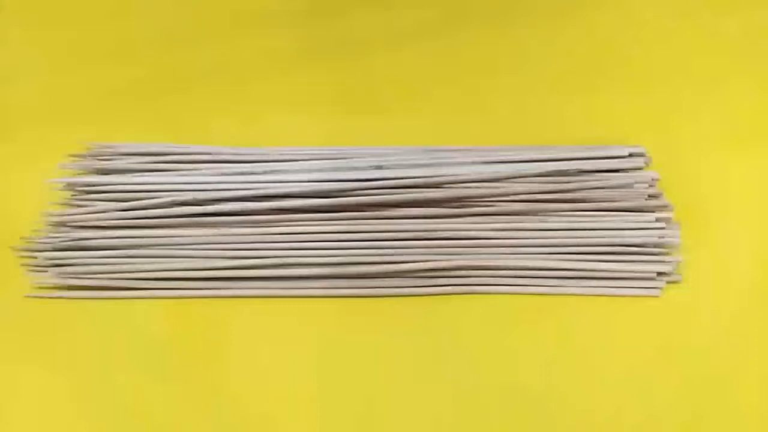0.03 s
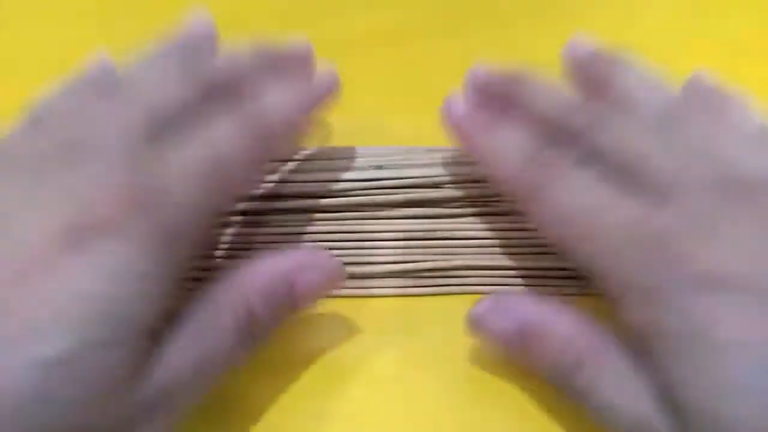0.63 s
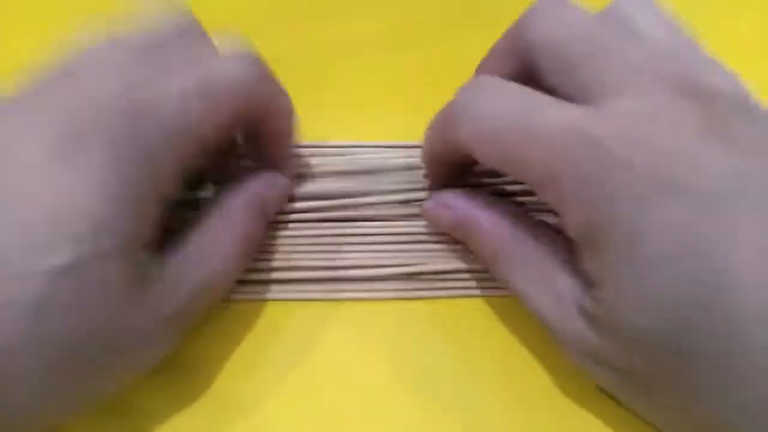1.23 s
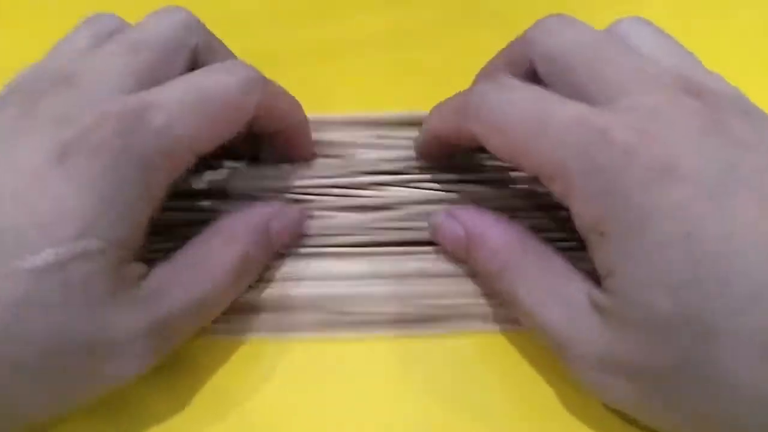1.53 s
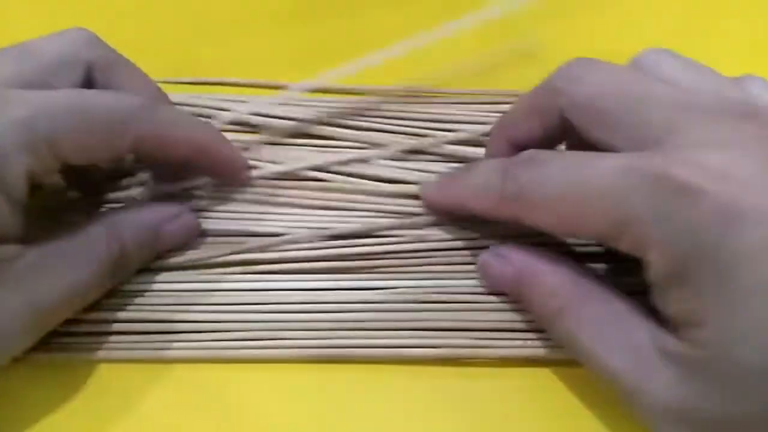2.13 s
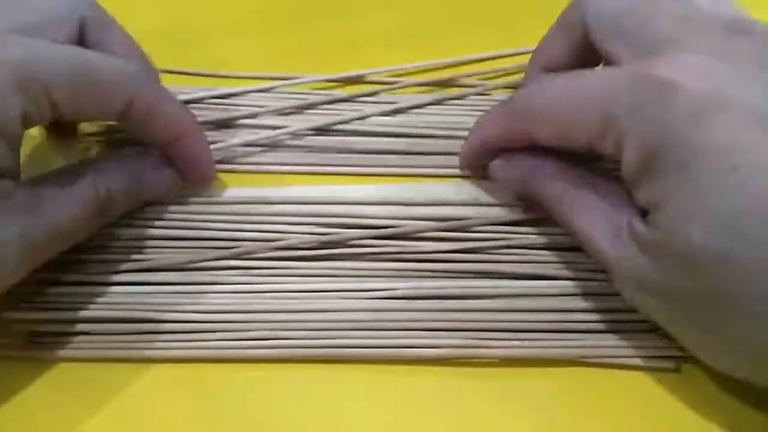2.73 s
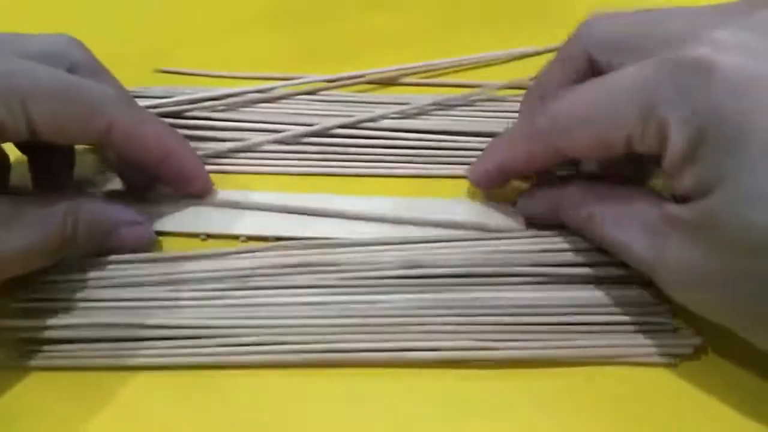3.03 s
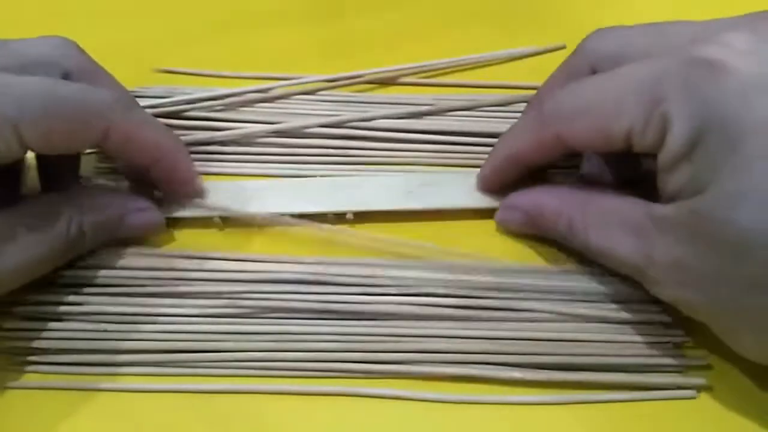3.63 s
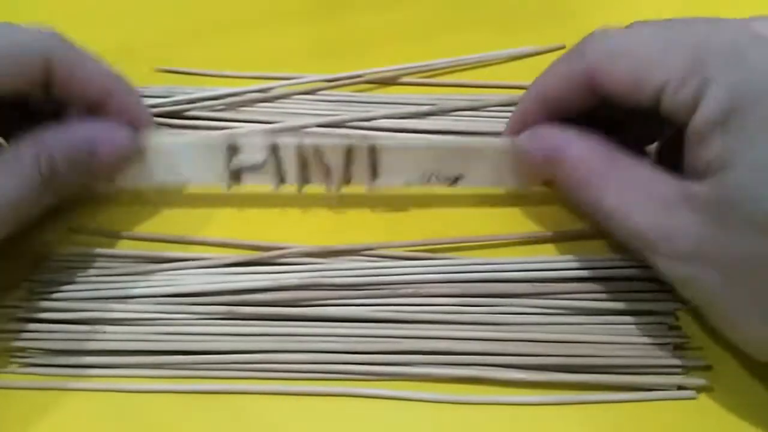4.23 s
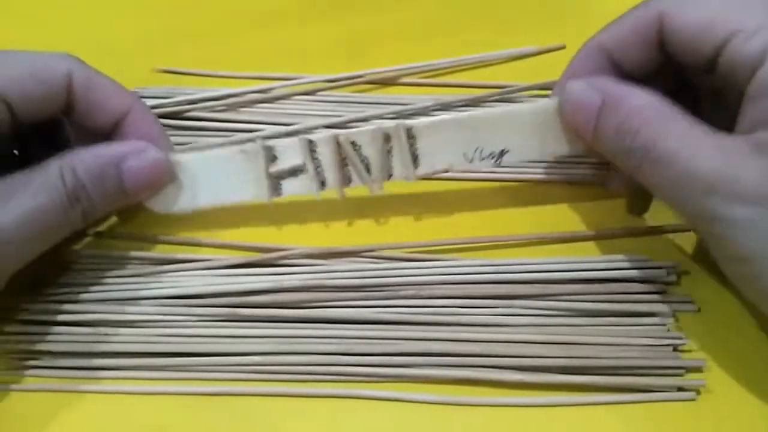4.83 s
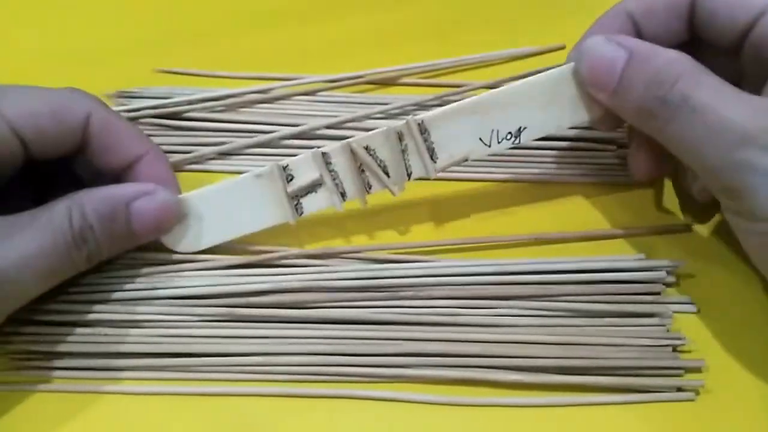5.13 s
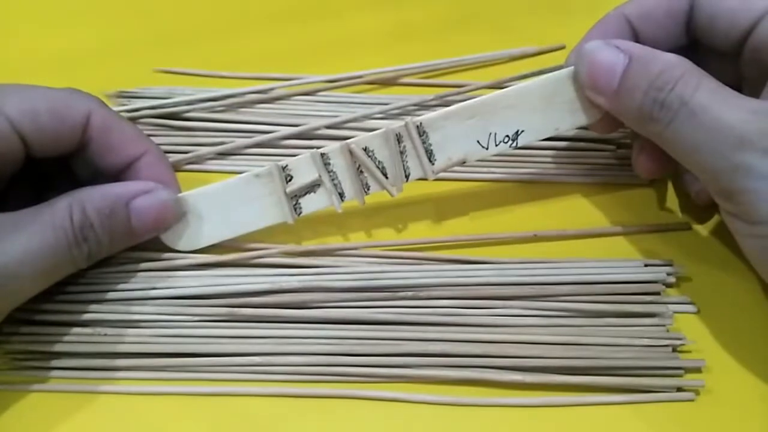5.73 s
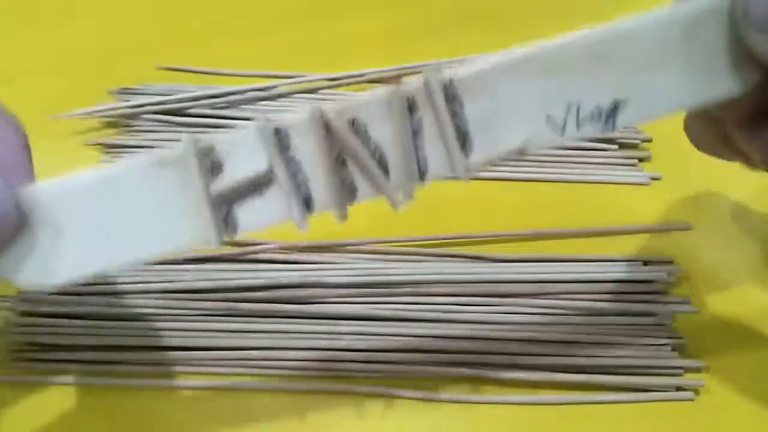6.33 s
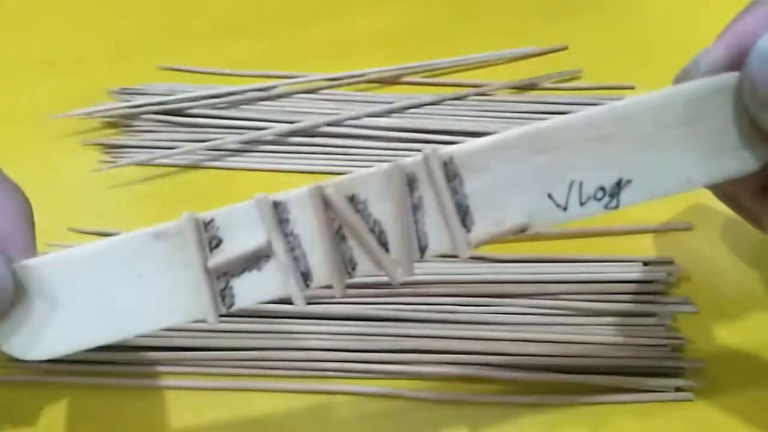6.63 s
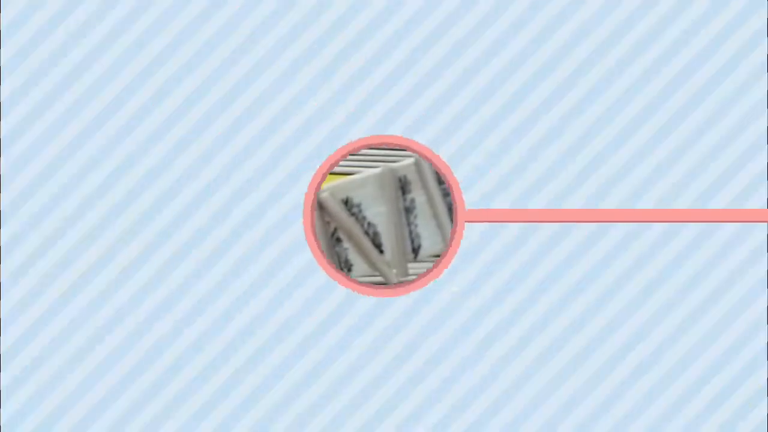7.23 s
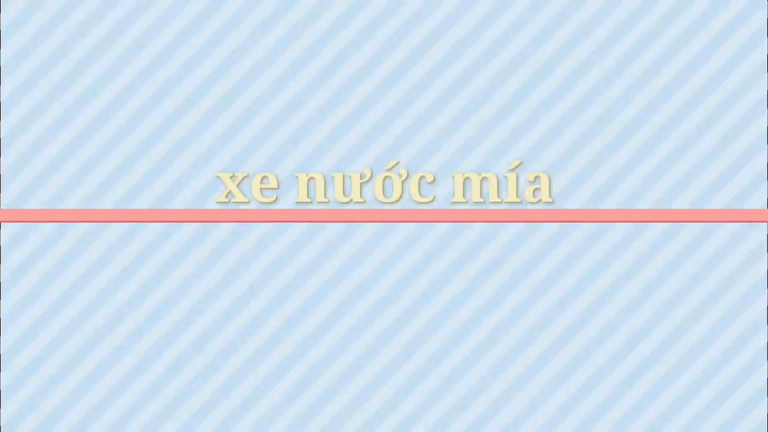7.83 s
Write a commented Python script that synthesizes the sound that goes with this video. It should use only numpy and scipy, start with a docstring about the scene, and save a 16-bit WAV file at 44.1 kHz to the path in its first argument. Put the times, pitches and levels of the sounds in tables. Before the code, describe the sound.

After a moment of faint room noise, hands shove and spread a pile of thin bamboo skewers on a table, making a dry rustling rattle with sharp clacks. About halfway through, the clatter ends with a few light knocks on a flat wooden slat. Faint finger rubbing follows, along with soft low bumps of air on the microphone. The wood sounds almost entirely on the right, in a small room.

```python
"""Faint room noise and a low puff of air come first; then two hands shove and part a pile of thin bamboo
skewers on a table. Each shove excites a swarm of stick-on-stick impacts, with sharper clacks among them.
A flat wooden slat is lifted out, its damped modes tapped and rubbed by the fingers. The wood and the
small room's reverberation lie almost wholly on the right; moving air buffets both microphone ports."""
import sys
import numpy as np
from scipy import signal
from scipy.fft import rfft, irfft
from scipy.io import wavfile
from scipy.ndimage import uniform_filter1d

SR = 44100
rng = np.random.default_rng(int(sys.argv[2]) if len(sys.argv) > 2 else 0)


def put_to_file(sound):
    """Save the sound as 16-bit audio at rate SR, in the file named by the first command-line argument."""
    columns = np.atleast_2d(sound).T  # one column per channel
    safe = np.clip(columns, -1, 1)
    whole_steps = np.round(safe * 32767)
    wavfile.write(sys.argv[1], SR, whole_steps.astype(np.int16))


N = 352359
TIME = np.arange(N) / SR

# Course of the room noise: time_s, level_db
AMBIENCE_LEVELS = [(.2, -60.5), (.7, -59.5), (2, -54.5), (3.9, -58), (4.8, -59), (6.9, -56.5), (8, -62)]
# Spectrum of the room noise: frequency_hz, gain_db
AMBIENCE_SPECTRUM = [(80, -21), (180, -2.5), (220, -6.5), (330, -15), (405, -6), (540, -17.5), (700, -16.5),
                     (950, -11), (1540, -20), (2200, -20.5), (2850, -29), (5200, -34.5), (7100, -45),
                     (15500, -53.5)]
# Spectrum of the faint hiss on the left: frequency_hz, gain_db
LEFT_HISS_SPECTRUM = [(100, -4.5), (210, 5), (300, -7.5), (700, -14), (1000, -16), (1500, -21), (3000, -23),
                      (5000, -31.5), (15000, -32.5)]
# Spectrum of the thin hiss on the right: frequency_hz, gain_db
THIN_HISS_SPECTRUM = [(1000, -21), (2600, 7.5), (5000, -5), (7000, -1), (15500, -15.5)]
# Puffs of air at the ports: peak_s, half_width_s, left_db, right_db
PUFFS = [(0.372, 0.02, -67, -45.5), (1.033, 0.11, -42.5, -47), (2.064, 0.051, -44, -46),
         (2.303, 0.12, -44, -54), (2.844, 0.06, -53, -54), (3.626, 0.061, -50, -48),
         (4.035, 0.039, -46, -45), (4.55, 0.48, -52.5, -54.5), (5.407, 0.15, -43.5, -47.5),
         (5.927, 0.28, -45.5, -44), (6.472, 0.13, -44.5, -42), (7.03, 0.2, -45.5, -44),
         (7.632, 0.018, -70, -39)]
# Rumble of a gentle draught: frequency_hz, gain_db
RUMBLE_SPECTRUM = [(15, -38.5), (28, -25), (54, 2.5), (80, -3), (150, -21), (260, -31.5), (600, -50),
                   (2000, -91)]
# Eddies that a strong draught adds: frequency_hz, gain_db
EDDY_SPECTRUM = [(40, -13.5), (110, -5.5), (180, 4.5), (300, -17.5), (600, -17.5), (1200, -53.5),
                 (3000, -83.5)]
# Radiation of the pile on the table: frequency_hz, gain_db
PILE_SPECTRUM = [(120, -37), (250, -13), (390, -10), (540, -21.5), (780, -13.5), (930, 3), (1100, -3),
                 (1300, -10), (1560, 3), (1900, -10.5), (2600, -9.5), (3400, -5.5), (5400, -4), (7200, -16),
                 (15500, -30.5)]
# Fingers push through the pile: start_s, length_s, level_db, body_over_usual_db
HAND_SHOVES = [(0.721, 0.0094, -43, -1.5), (0.739, 0.0094, -44.5, 5), (1.021, 0.031, -57, -10),
               (1.068, 0.011, -50, 1.5), (1.102, 0.014, -49.5, -3), (1.245, 0.008, -52.5, -7),
               (1.272, 0.0046, -32, 2), (1.282, 0.015, -34.5, -0.5), (1.326, 0.015, -49.5, -12),
               (1.444, 0.069, -45, -1), (1.56, 0.087, -41.5, 3.5), (1.79, 0.0078, -48, -1.5),
               (1.876, 0.013, -51, 5), (2.019, 0.031, -45.5, 1), (2.059, 0.12, -48, -3.5),
               (2.427, 0.079, -47, 1), (2.54, 0.036, -47.5, -1.5), (2.597, 0.12, -51, 1),
               (2.818, 0.062, -48.5, 1.5), (2.978, 0.0085, -46, -7.5), (3.046, 0.033, -49, -2.5),
               (3.176, 0.051, -50.5, 2.5), (3.33, 0.018, -48.5, -6.5), (3.452, 0.011, -56, -8),
               (3.521, 0.017, -50, -5.5), (3.646, 0.083, -56, 0.5), (3.781, 0.014, -53.5, 3),
               (3.821, 0.1, -50, 1), (5.937, 0.0055, -58.5, -5), (6.03, 0.029, -65.5, -2)]
# Fingers keep stirring the pile: start_s, end_s, level_db, body_relative_db
HAND_STIRS = [(1.303, 1.722, -52.5, -5), (1.72, 1.996, -65, 3.5), (2.002, 2.414, -55.5, 1.5),
              (2.415, 3.32, -65, 4)]
# One stick snaps onto another:
# start_s, level_before_gain_db, body_relative_db, edge_relative_db, ring_hz, ring_db, bounce_step_db
STICK_CLACKS = [(0.727, -37, -16, 1, 5200, 10, -7), (0.735, -39.5, -9, -5, 4400, 2, -5),
                (0.750, -35, -1, -7, 4560, 9, -8), (1.026, -53.5, 6.5, -7, 4970, 12, -3),
                (1.067, -42, -2.5, -14, 4440, 14, -1.5), (1.088, -46, -8, -20, 4130, 18, 0),
                (1.109, -41.5, -4.5, -10, 4500, 12, -7), (1.248, -46, -10.5, -16, 4000, 10, -3),
                (1.268, -28.5, -10, -7, 4400, 6, -2.5), (1.282, -24, -2, -12, 5350, 18, -4.5),
                (1.287, -26, -7, -16, 5200, 11, -17), (1.388, -42.5, -7, -16, 4840, 3, -1.5),
                (1.437, -36.5, -12, -14, 3370, 2, -2.5), (1.457, -41, -18, -14, 5200, 6, -1),
                (1.472, -31.5, -15, -23, 5400, 2.5, -12), (1.524, -36, 1, -25, 5300, 19, -14),
                (1.553, -40, 5.5, -20, 4460, 0, -10), (1.602, -36, -12, -14, 4500, 2, -2),
                (1.609, -36, -10, -13, 3900, 8, -5), (1.635, -33, -10, -9, 3870, 1, -2),
                (1.794, -37, -9, -10, 5200, 2, -9), (1.873, -44, -8, -18, 4900, 5, -4),
                (1.885, -37, -11, -24, 5300, 16, -10), (2.01, -29.5, -2, -2.5, 5450, 18, -13),
                (2.025, -33, -23, -22, 5500, 14, -16), (2.03, -37, -18, -20, 5500, 12, -16),
                (2.04, -27.5, -4.5, -14, 5400, 17, -13), (2.045, -34, -12, -18, 5450, 10, -12),
                (2.078, -41, -14, -18, 5600, 11, -12), (2.1, -34.5, -18, -20, 5350, 9, -12),
                (2.126, -32, -20, -21, 4660, 17, -18), (2.159, -40.5, 5, -1, 5200, 8, -12),
                (2.247, -40, -0.5, -8, 4950, 12, -11), (2.316, -39, 1, -8, 5130, 12, -11),
                (2.384, -45, -7, -16, 4800, 6, -12), (2.419, -42.5, 0, -11, 4800, 2, -2),
                (2.444, -37.5, -13, -7, 4670, 8, -3.5), (2.487, -36, -10, -20, 4730, 10, -3),
                (2.508, -39, -5, -4, 4140, 4.5, -8), (2.534, -34.5, -7, -6, 4300, 13, -7.5),
                (2.625, -41, -13, -16, 3400, 13, -6), (2.659, -45, -8, -18, 5500, 6, -2),
                (2.685, -32.5, -11, -14, 4400, 10, -7), (2.802, -45, -1.5, -12, 4200, 1, -4),
                (2.821, -37, -14, -19, 4860, 1, -6), (2.831, -35.5, -24, -8.5, 4530, -7, -4),
                (2.895, -37.5, -12, -10, 4000, -10, -10), (2.981, -41, -12, -9, 4920, -4, -1),
                (3.033, -51, -14, -1, 5000, 0, -8), (3.051, -50, -17, -16, 5030, 1, -3),
                (3.081, -45, -13, -15, 3730, -1, -1.5), (3.181, -45.5, -17, -8, 4600, -2, 1),
                (3.207, -43, -5, -12, 3390, 9, -8), (3.302, -51, -14, -20, 4700, 14, -12),
                (3.318, -38, -12, -6, 5430, -4, -9), (3.342, -45.5, -8, -5, 6900, 11, -5),
                (3.525, -42.5, -5, -6, 4730, -2, -1), (3.564, -44, -4, -7, 3360, 15, -1.5),
                (3.677, -47.5, -11, -1, 5450, 16, -3), (3.686, -39.5, -8, -9, 3750, 11, -7.5),
                (3.785, -45, -10, -5, 3350, 11, -10), (3.799, -46, -10, -17, 3400, 12, -6),
                (3.821, -41, 5.5, -7, 3540, 5, -4.5), (3.867, -44, -9, -12, 4400, 3, -12),
                (3.888, -39, -2, -10, 4580, 7, -3), (3.921, -42, -8, -13, 4600, 0, -11),
                (5.919, -44, -10, -14, 4960, 9, -7)]
# Resonances of the table top: pitch_hz, bandwidth_hz, gain_db
TABLE_RESONANCES = [(437, 27, -2), (1052, 27, -8.5), (1100, 30, -8.5), (1670, 38, -11)]
# Spectrum that the walls reflect: frequency_hz, gain_db
WALL_SPECTRUM = [(150, -9.5), (1500, -2), (5000, -2), (7500, -6), (15000, -0.5)]
# The strongest puffs strike the right port: peak_s, level_before_bass_cut_db, half_width_s
PRESSURE_PULSES = [(0.967, -29.5, 0.0022), (0.994, -28.5, 0.0033), (1.04, -34, .002), (1.093, -25, 0.0023),
                   (2.085, -32.5, 0.0033), (2.239, -33.5, 0.0021), (5.328, -24.5, 0.0017),
                   (5.438, -23.5, 0.0021), (5.798, -27.5, 0.0019), (5.852, -20.5, 0.0017),
                   (5.967, -30, 0.0022), (6.327, -26.5, 0.0035), (6.362, -26.5, 0.0015),
                   (6.409, -22.5, 0.0017), (6.426, -20.5, 0.00087), (6.506, -29, 0.0026),
                   (6.545, -30, 0.0017), (6.898, -34.5, 0.0033), (6.957, -31.5, 0.0036),
                   (7.051, -36, 0.0023), (7.096, -28.5, 0.002), (7.131, -32.5, 0.0029)]
# Dull knocks with a low ring: start_s, level_db, pitch_hz, t60_s
DULL_KNOCKS = [(1.282, -28.5, 400, 0.06), (6.379, -27.5, 256, 0.067)]
# Fingers and sticks strike the slat: start_s, level_db, favoured_hz
SLAT_KNOCKS = [(3.207, -41, 1590), (3.221, -39.5, 960), (3.319, -34, 1560), (3.566, -40.5, 1110),
               (3.687, -38, 1570), (3.822, -34, 1090), (3.888, -35.5, 1120), (3.981, -42.5, 900),
               (4.309, -45, 2680), (4.431, -44, 2700), (5.921, -46, 1640)]
# Modes of the slat: pitch_hz, t60_s
SLAT_RESONANCES = [(906, 0.046), (1070, 0.035), (1590, 0.042), (2480, 0.02), (2720, 0.017), (3000, 0.0089),
                   (4400, .015)]
# Dull tick of a knock on the slat: frequency_hz, gain_db
TICK_SPECTRUM = [(300, -12), (900, -3), (1800, -0.5), (2800, -1.5), (3500, -17), (5500, -20), (8000, -42),
                 (15000, -49)]
# Fingertips slide along the slat: peak_s, half_width_s, level_db
FINGER_SLIDES = [(4.232, 0.04, -61.5), (4.327, 0.021, -60), (4.448, 0.037, -68), (6.35, .03, -68),
                 (6.594, 0.066, -64), (6.802, 0.043, -65), (6.973, 0.04, -62), (7.1, 0.057, -62.5),
                 (7.264, 0.036, -62.5)]
# Spectrum of skin rubbing on wood: frequency_hz, gain_db
FRICTION_SPECTRUM = [(300, -25), (650, -6.5), (880, 10.5), (1400, 4.5), (2200, -1.5), (3000, -17),
                     (4200, -21), (6000, -27), (12000, -53)]


def undb(db):
    """Amplitude grows tenfold for every 20 dB."""
    return 10 ** (np.asarray(db) / 20)


def unit(x):
    """Normalisation gives a response unit energy."""
    return x / np.sqrt(np.sum(x ** 2))


def decay(t, t60_s):
    """Exponential damping loses 60 dB in t60_s."""
    return np.exp(-np.log(1000) * t / t60_s)


def add(out, start_s, sound):
    """Superposition: a short sound sums into the whole at start_s."""
    start = int(start_s * SR)
    out[start:start + len(sound)] += sound[:N - start]


def convolve(x, response):
    """A linear system convolves its input with its impulse response."""
    return signal.oaconvolve(x, response)[:N]


def colour(spectrum, size=4096):
    """Minimum phase: folding the cepstrum gives a spectrum its causal, unit-energy response."""
    hz, db = np.transpose(spectrum)
    bins_hz = np.maximum(np.arange(size // 2 + 1) * SR / size, 1)
    cepstrum = irfft(np.log(undb(np.interp(np.log(bins_hz), np.log(hz), db))))
    cepstrum[1:size // 2] *= 2
    cepstrum[size // 2 + 1:] = 0
    return unit(irfft(np.exp(rfft(cepstrum))))


def noise(spectrum):
    """Filtered white noise takes on the filter's spectrum, here at unit rms."""
    return convolve(rng.standard_normal(N), colour(spectrum))


def room_noise(depth_db, changes_per_s):
    """Amplitude modulation: two middle octaves of the room noise swell and sink independently."""
    knots_s = np.arange(0, TIME[-1] + 1, 1 / changes_per_s)
    out = steady = noise(AMBIENCE_SPECTRUM)
    for low_hz in (700, 1400):
        octave = signal.butter(2, [low_hz, 2 * low_hz], "band", fs=SR, output="sos")
        swell = undb(depth_db * np.interp(TIME, knots_s, rng.standard_normal(len(knots_s))))
        out = out + signal.sosfiltfilt(octave, steady) * (swell - 1)
    return out


def thin_hiss(level_db, hold_until_s, fall_db_per_s):
    """An airy hiss holds steady, then decays exponentially once the pile lies still."""
    return undb(level_db - fall_db_per_s * np.maximum(TIME - hold_until_s, 0)) * noise(THIN_HISS_SPECTRUM)


def draught(calm_db):
    """Incoherent powers add: bell-shaped puffs over a calm flow give each port's level in dB."""
    power = undb(calm_db)[:, None] ** 2
    for peak_s, half_s, left_db, right_db in PUFFS:
        bell = np.exp(-((TIME - peak_s) / half_s) ** 2)
        power = power + np.outer(undb([left_db, right_db]) ** 2, bell)
    return 10 * np.log10(power)


def buffet(flow_db, eddy_db, strong_db, growth):
    """Turbulence rumbles on a port; small eddies grow faster than the rumble as the draught rises."""
    rumble = noise(RUMBLE_SPECTRUM)
    rumble /= np.sqrt(uniform_filter1d(rumble ** 2, size=3500))  # the flow alone sets a puff's strength
    eddies = undb(eddy_db + growth * (flow_db - strong_db)) * noise(EDDY_SPECTRUM)
    return undb(flow_db) * (rumble + eddies)


def skewer(ring_hz, ring_db, ring_width_hz, crack_db, crack_s, size=2048):
    """A struck free bar bends in modes spaced as (2k + 1) squared; returns body, ring and edge bands."""
    t = TIME[:size]
    lie_shift = np.exp(.048 * rng.standard_normal())  # where a stick lies shifts the pile's spectrum
    pile = colour(np.array(PILE_SPECTRUM) * [lie_shift, 1], size)
    lowest_hz = 200.65 * np.exp(.14 * rng.standard_normal())  # no two sticks are equally thick
    ratios = ((2 * np.arange(1, 12) + 1) / 3) ** 2
    hz = np.minimum(lowest_hz * ratios, SR / 2)[:, None]
    t60_s = .037 * (hz / 1000) ** -.4
    weights = rng.standard_normal(hz.shape) * hz ** .37
    modes = unit(np.sum(weights * np.sin(2 * np.pi * hz * t) * decay(t, t60_s), axis=0))
    # fibres grip and slip: a dry snap that favours no pitch
    grip = np.sqrt(t) * np.exp(-t / crack_s)
    slips = rfft(rng.standard_normal(size) * grip)
    crack = unit(irfft(slips / np.abs(slips)) * np.sqrt(grip))
    sound = signal.fftconvolve(modes + undb(crack_db) * crack, pile)[:size]
    resonance = signal.iirpeak(ring_hz, ring_hz / ring_width_hz, SR)
    sound = sound + undb(ring_db) * signal.lfilter(*resonance, sound)
    # body radiated by the table, ring of the stick, sharp edge of the contact
    body_hz, edge_hz = 2400, 7500
    bands = [signal.butter(4, cut_hz, kind, fs=SR, output="sos")
             for cut_hz, kind in [(body_hz, "low"), ([body_hz, edge_hz], "band"), (edge_hz, "high")]]
    return np.array([unit(signal.sosfilt(band, sound)) for band in bands])


def hand_power(ring_db=-2.5, usual_db=-52):
    """Stirring and shoves add in power in the body, ring and edge bands."""
    power = np.zeros((3, N))
    for start_s, end_s, db, body_db in HAND_STIRS:
        power += np.outer(undb(db) * undb([body_db, 0, -14.5]), (TIME > start_s) & (TIME < end_s)) ** 2
    for start_s, length_s, db, body_db in HAND_SHOVES:
        near = slice(int((start_s - .4) * SR), int((start_s + .6) * SR))
        age = TIME[near] - start_s
        # time per 20 dB: a longer shove loosens more sticks, so it builds and settles more slowly
        rise_s, fall_s = .0041 + .51 * length_s, .04 + .22 * length_s
        swell = undb(db - 20 * np.maximum(np.maximum(-age / rise_s, (age - length_s) / fall_s), 0))
        force_db = db - usual_db  # harder shoves mostly ring the sticks
        tone = undb([body_db - 2.73 - .026 * force_db, ring_db, -12.5 - .074 * force_db])
        power[:, near] += np.outer(tone, swell) ** 2
    return power


def contacts(usual_per_s=1300, spread_db=2.5, flurries_per_s=110, flurry_db=2, scatter_db=4, snap_db=3):
    """A Poisson process, denser and harder as the hands push: sample indices and three band amplitudes."""
    power = hand_power()
    rate = usual_per_s * (power[1] / undb(-45.5) ** 2) ** .2
    at = np.flatnonzero(rng.random(N) < rate / SR)
    count = len(at)
    strength = undb(spread_db * np.minimum(rng.exponential(size=count), 3)) * rng.choice([-1, 1], count)
    strength *= np.sqrt(SR / rate[at] / np.mean(strength ** 2))
    # the pile jams and gives way in flurries
    knots_s = np.arange(0, TIME[-1], 1 / flurries_per_s)
    flurry = undb(flurry_db * np.interp(TIME[at], knots_s, rng.uniform(-1.7, 1.8, len(knots_s))))
    bands = strength * flurry / np.sqrt(np.mean(flurry ** 2)) * np.sqrt(power[:, at])
    # the table answers each contact differently; a caught splinter snaps brighter
    bands[0] *= undb(scatter_db * rng.uniform(-1.93, 1, count))
    bands[2] *= undb(snap_db * (np.minimum(rng.exponential(size=count), 4) - 1.5))
    return at, bands.T


def rustle(new_sticks_per_s, count=130, handful=9):
    """Impacts superpose on a handful of sticks, which changes as the fingers work through the pile."""
    rings_hz = 4600 * np.exp(.17 * np.clip(rng.standard_normal(count), -2, 2))
    sticks = [skewer(hz, ring_db=1, ring_width_hz=500, crack_db=1, crack_s=.0014) for hz in rings_hz]
    out = np.zeros(N)
    for at, amplitudes in zip(*contacts()):
        struck = (int(new_sticks_per_s * TIME[at]) + rng.integers(handful)) % count
        add(out, TIME[at], amplitudes @ sticks[struck])
    return out


def clacks(gain_db, bounce_s, bounces=3):
    """Hard impacts rebound: pinned sticks fall quiet at once, loose ones chatter."""
    out = np.zeros(N)
    for start_s, db, body_db, edge_db, ring_hz, ring_db, step_db in STICK_CLACKS:
        gaps_s = bounce_s * rng.uniform(.55, 1.5, bounces)
        for k in range(bounces):
            bands = skewer(ring_hz, ring_db, ring_width_hz=750, crack_db=4, crack_s=.0017)
            amplitudes = undb(db + gain_db + k * step_db) * undb([body_db, 0, edge_db])
            add(out, start_s + np.sum(gaps_s[:k]), amplitudes @ bands)
    return out


def table_top(rattle):
    """Forced vibration: the table top adds its resonances to whatever rattles on it."""
    return rattle + sum(undb(db) * signal.lfilter(*signal.iirpeak(hz, hz / width_hz, SR), rattle)
                        for hz, width_hz, db in TABLE_RESONANCES)


def room(direct, early_db, early_s, wall_db, wall_s, tail_db, split_hz=3000):
    """Reflections return from table, hands and nearest wall; the reverberant tail loses its treble first."""
    t = TIME[:SR // 2]
    early = unit(rng.standard_normal(len(t)) * np.exp(-t / early_s) * (t > .002))
    wall = unit(rng.standard_normal(len(t)) * np.exp(-((t - wall_s) / .0003) ** 2))
    crossover = [signal.butter(2, split_hz, kind, fs=SR, output="sos") for kind in ("low", "high")]
    lows, highs = (signal.sosfilt(band, rng.standard_normal(len(t))) for band in crossover)
    tail = unit((lows * decay(t, t60_s=.67) + highs * decay(t, t60_s=.32)) * (t > .008))
    reflections = undb(early_db) * early + undb(wall_db) * wall + undb(tail_db) * tail
    return direct + convolve(convolve(direct, colour(WALL_SPECTRUM)), reflections)


def thuds(cut_hz, damping, flutter_db, flutter_s, flutter_width_s):
    """Pressure pulses, each amid three softer ones, overshoot in the microphone's underdamped bass cut."""
    pressure, t = np.zeros(N), TIME[:SR // 25] - 1 / 50
    for peak_s, db, half_s in PRESSURE_PULSES:
        add(pressure, peak_s + t[0], undb(db) * np.exp(-(t / half_s) ** 2))
        flutter = undb(db + flutter_db) * np.exp(-(t / flutter_width_s) ** 2)
        for shift_s in flutter_s * rng.uniform(-1.021, 1, 3):
            add(pressure, peak_s + t[0] + shift_s, flutter)
    omega = 2 * np.pi * cut_hz
    bass_cut = signal.bilinear([1, 0, 0], [1, damping * omega, omega ** 2], SR)
    return signal.lfilter(*bass_cut, pressure)


def dull_knocks(attack_s):
    """Each knock rings briefly on one low note, as a damped oscillator."""
    out, t = np.zeros(N), TIME[:SR // 5]
    attack = 1 - np.exp(-t / attack_s)
    for start_s, db, hz, t60_s in DULL_KNOCKS:
        add(out, start_s, undb(db) * np.sin(2 * np.pi * hz * t) * decay(t, t60_s) * attack)
    return out


def slat(held_s, fidget_db, skid_s, skid_step_db, tick_db, tick_s=.0022, press_s=.0005, touches=4):
    """Modal excitation by skidding knocks: the spot struck picks the slat's modes, the grip detunes them."""
    out, t = np.zeros(N), TIME[:4096]
    hz, t60_s = np.transpose(SLAT_RESONANCES)[:, :, None]
    envelope = decay(t, t60_s) * (1 - np.exp(-t / press_s))
    dull = colour(TICK_SPECTRUM)
    # fingertips keep shifting while they hold the slat
    fidgets = [(rng.uniform(*held_s), fidget_db + 3 * rng.standard_normal(), rng.uniform(540, 3000))
               for _ in range(40)]
    for start_s, db, favoured_hz in list(SLAT_KNOCKS) + fidgets:
        gaps_s = skid_s * rng.uniform(.36, 1.6, touches)
        for k in range(touches):
            gripped_hz = hz * np.exp(.028 * rng.standard_normal(hz.shape))
            weights = rng.choice([-1, 1], hz.shape) / (1 + (np.log(hz / favoured_hz) / .1) ** 2)
            modes = np.sum(weights * np.sin(2 * np.pi * gripped_hz * t) * envelope, axis=0)
            burst = rng.standard_normal(len(t)) * np.exp(-t / tick_s)
            tick = undb(tick_db) * unit(signal.fftconvolve(burst, dull)[:len(t)])
            add(out, start_s + np.sum(gaps_s[:k]), undb(db + k * skid_step_db) * (modes + tick))
    return out


def rubs(slips_per_s):
    """Stick-slip friction: skin moves along the slat in tiny random steps."""
    force = sum(undb(db) * np.exp(-((TIME - peak_s) / half_s) ** 2) for peak_s, half_s, db in FINGER_SLIDES)
    slips = (rng.random(N) < slips_per_s / SR) * rng.standard_normal(N) * np.sqrt(SR / slips_per_s)
    return convolve(force * slips, colour(FRICTION_SPECTRUM))


def pop(start_s, level_db, decay_s):
    """A decaying step makes a faint pop, in antiphase between the channels."""
    age = np.maximum(TIME - start_s, 0)
    return np.outer([1, -1], undb(level_db) * (age > 0) * np.exp(-age / decay_s))


def scene():
    """Sources superpose: wood and room on the right, a late dull trace on the left, draught on both."""
    sticks = table_top(rustle(new_sticks_per_s=38) + clacks(gain_db=17.5, bounce_s=.0019))
    taps = slat(held_s=(4, 7.2), fidget_db=-63, skid_s=.006, skid_step_db=-5.5, tick_db=11.5)
    direct = sticks + dull_knocks(attack_s=.0024) + taps + rubs(slips_per_s=2500)
    wood = room(direct, early_db=-13.5, early_s=.0072, wall_db=-11, wall_s=.015, tail_db=-11)
    ambience_gain = undb(np.interp(TIME, *np.transpose(AMBIENCE_LEVELS)))
    in_room = wood + ambience_gain * room_noise(depth_db=2.2, changes_per_s=14)
    left_lag_s, muffle_hz = .0006, 600
    delayed = np.roll(in_room, int(left_lag_s * SR))
    muffled = signal.sosfilt(signal.butter(2, muffle_hz, fs=SR, output="sos"), delayed)
    left_db, right_db = draught(calm_db=(-60.5, -59))
    left = undb(-25) * muffled + undb(-11.5) * ambience_gain * noise(LEFT_HISS_SPECTRUM)
    left += buffet(left_db, eddy_db=-23.5, strong_db=-44.5, growth=.2)
    right = in_room + thin_hiss(level_db=-73, hold_until_s=4.17, fall_db_per_s=23)
    right += buffet(right_db, eddy_db=-16.5, strong_db=-40, growth=.59)
    right += thuds(cut_hz=64.5, damping=.41, flutter_db=-12, flutter_s=.04474, flutter_width_s=.0014)
    return np.array([left, right]) + pop(start_s=5.4233, level_db=-38.5, decay_s=.002)


def record(dry):
    """Band limiting: a steep low-pass cuts the top of the sound, which opens quickly and fades out."""
    open_s, open_width_s, end_s, fade_s, top_hz = .22, .036, 8.183, .75, 15800
    fade_in = (1 + np.tanh((TIME - open_s) / open_width_s)) / 2
    fade_out = np.clip((end_s - TIME) / fade_s, 0, 1)
    return signal.sosfilt(signal.ellip(8, .2, 70, top_hz, fs=SR, output="sos"), dry * fade_in * fade_out)


dry = scene()
out = record(dry)
put_to_file(out)
```